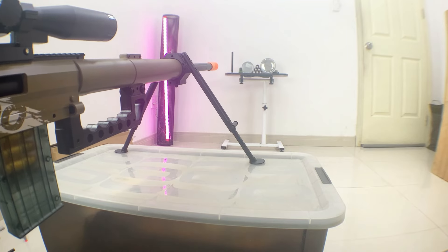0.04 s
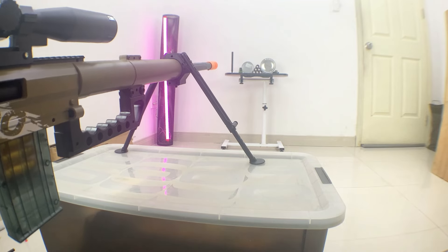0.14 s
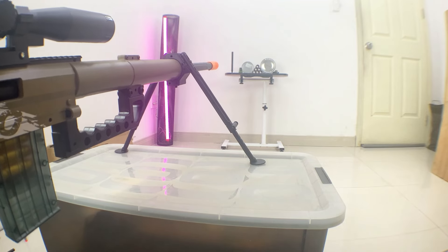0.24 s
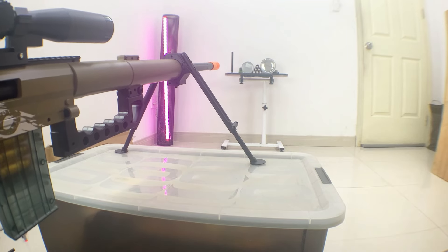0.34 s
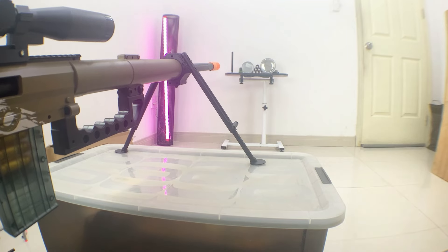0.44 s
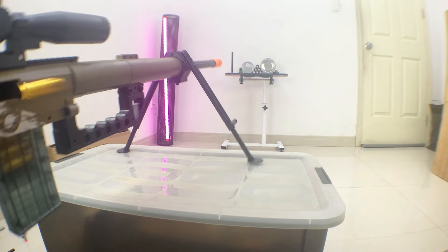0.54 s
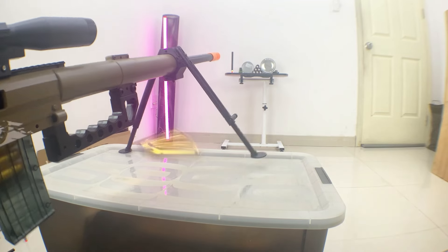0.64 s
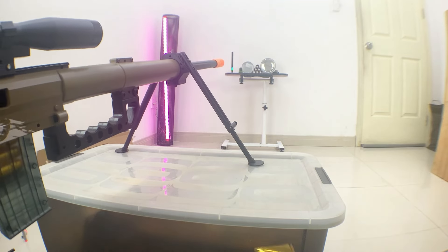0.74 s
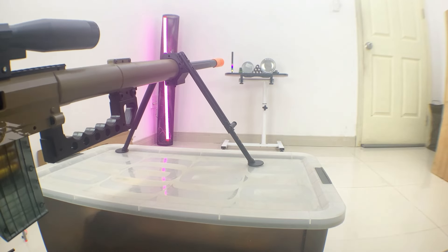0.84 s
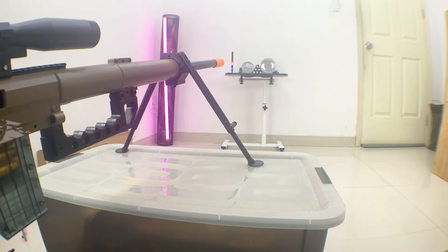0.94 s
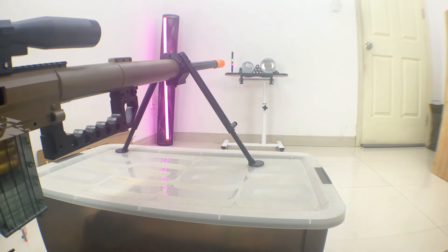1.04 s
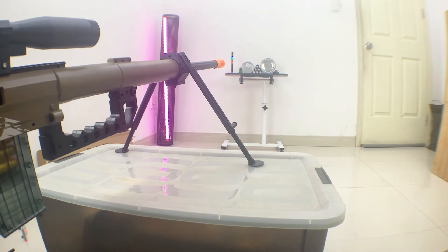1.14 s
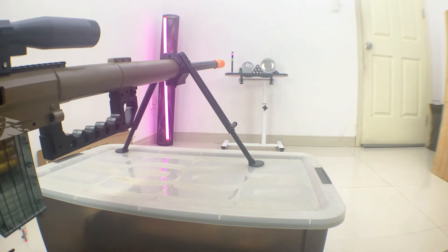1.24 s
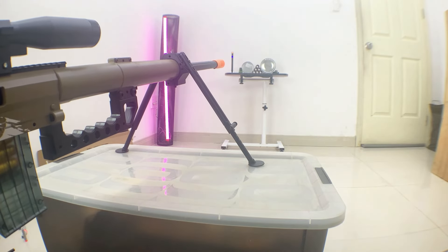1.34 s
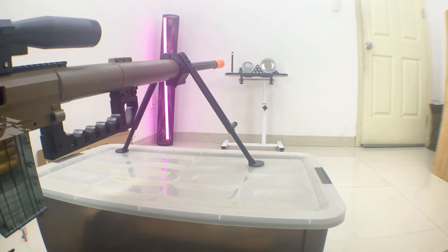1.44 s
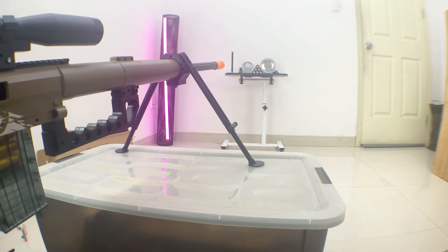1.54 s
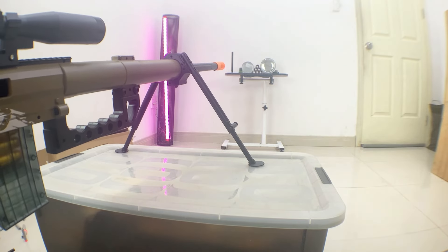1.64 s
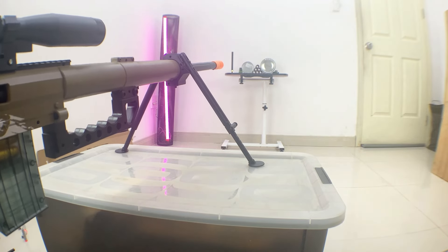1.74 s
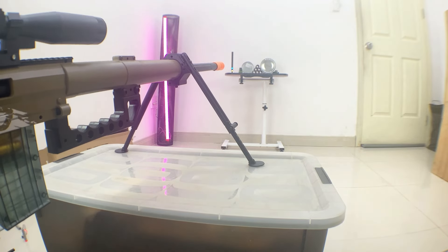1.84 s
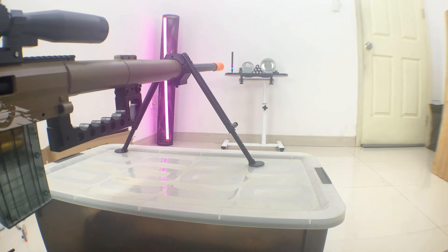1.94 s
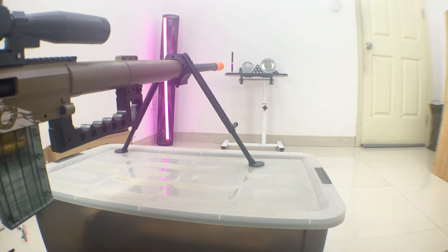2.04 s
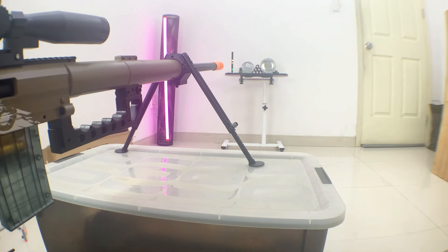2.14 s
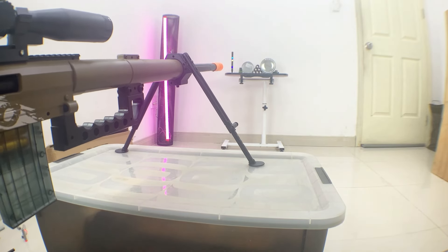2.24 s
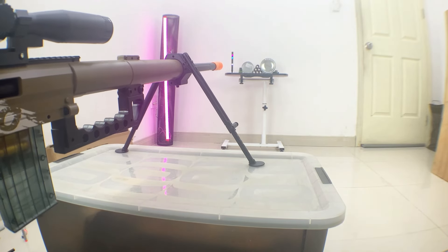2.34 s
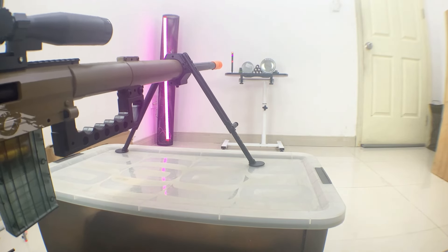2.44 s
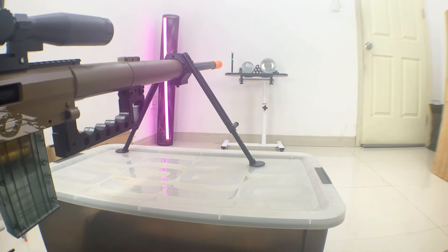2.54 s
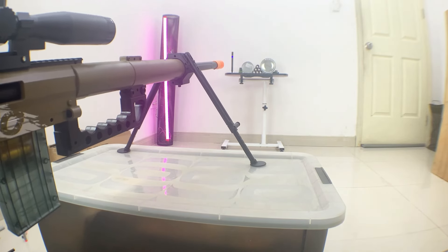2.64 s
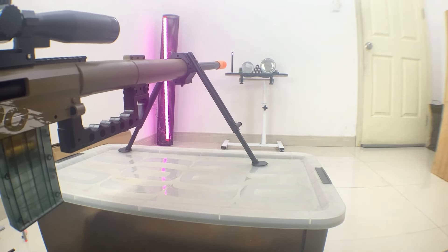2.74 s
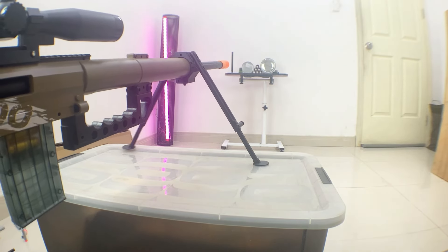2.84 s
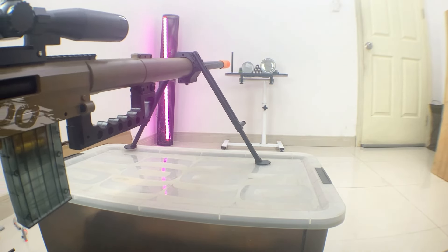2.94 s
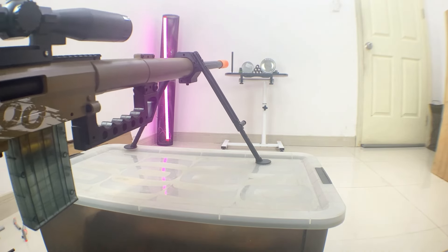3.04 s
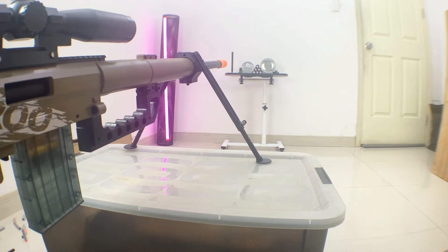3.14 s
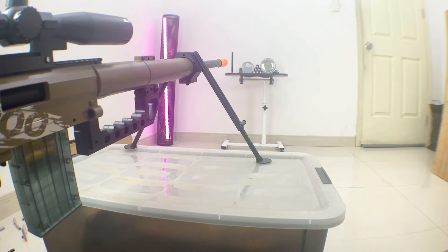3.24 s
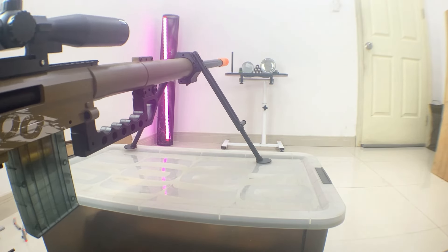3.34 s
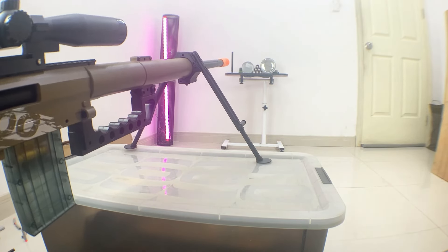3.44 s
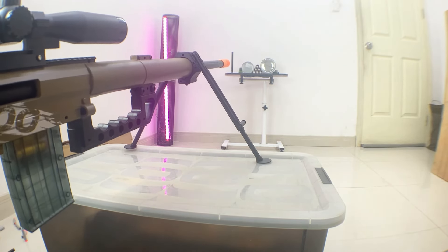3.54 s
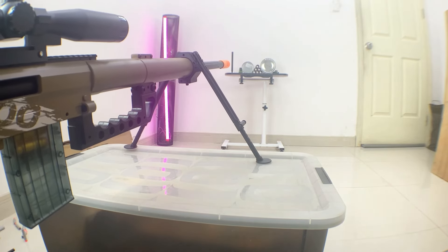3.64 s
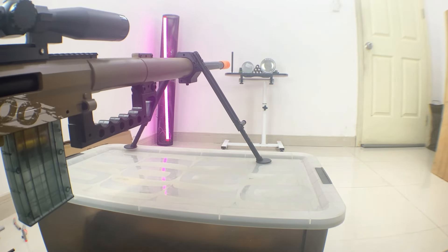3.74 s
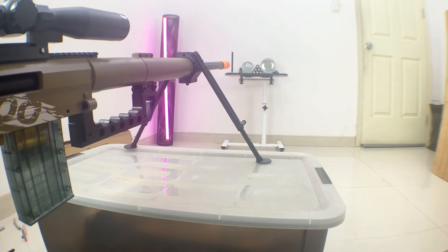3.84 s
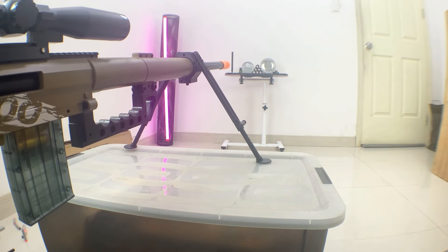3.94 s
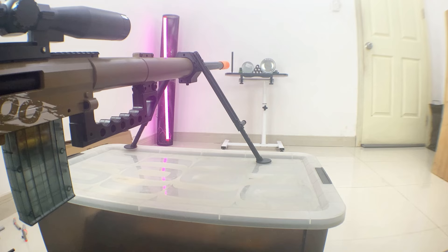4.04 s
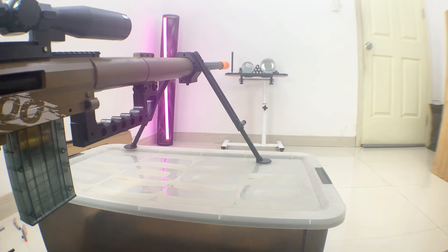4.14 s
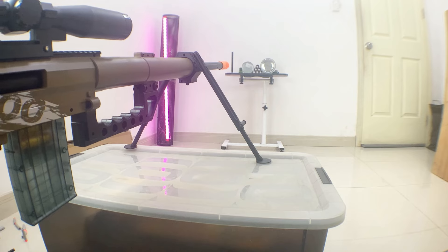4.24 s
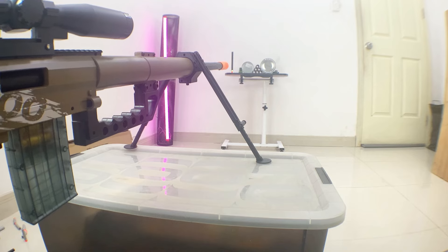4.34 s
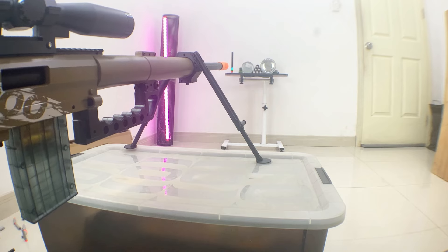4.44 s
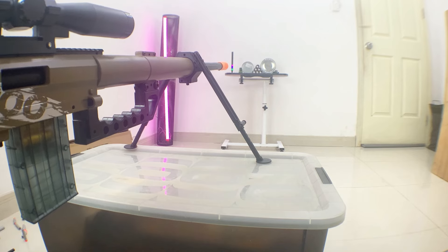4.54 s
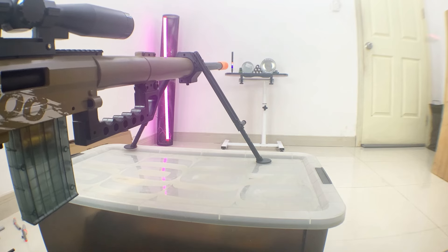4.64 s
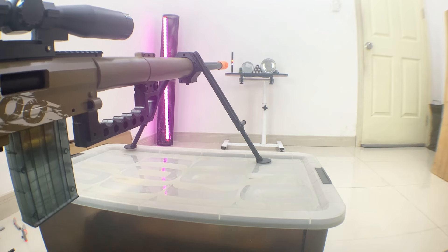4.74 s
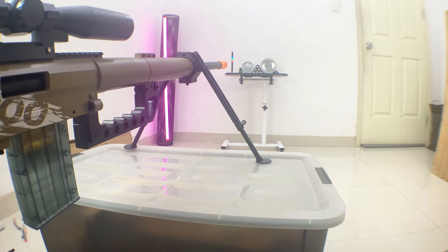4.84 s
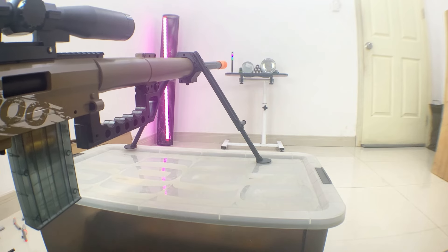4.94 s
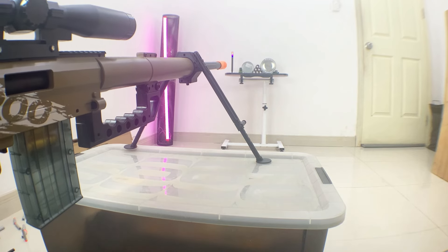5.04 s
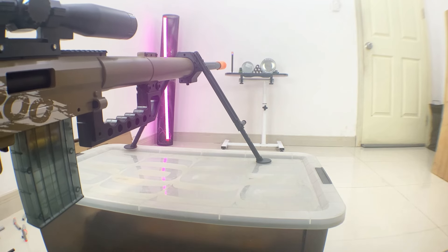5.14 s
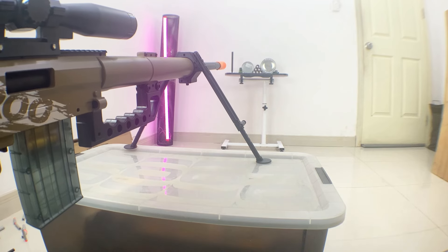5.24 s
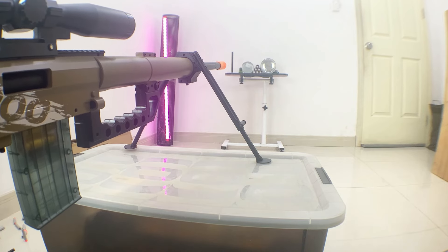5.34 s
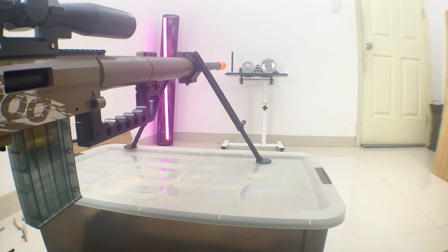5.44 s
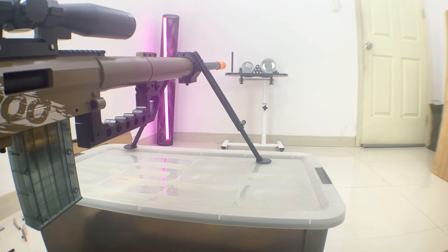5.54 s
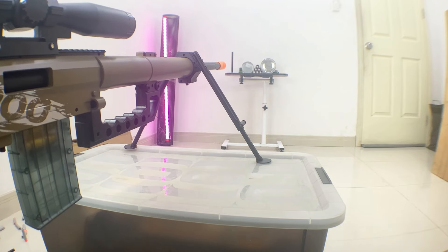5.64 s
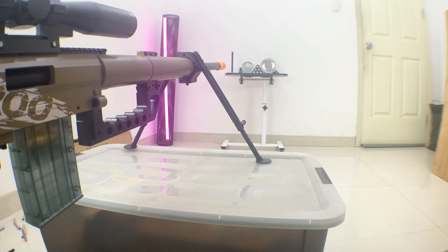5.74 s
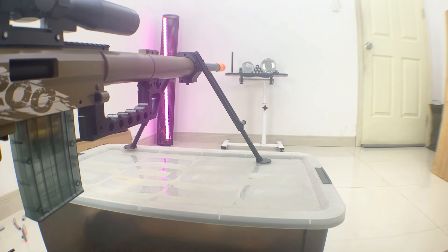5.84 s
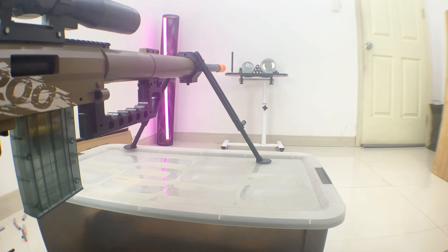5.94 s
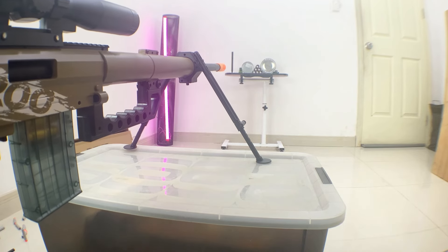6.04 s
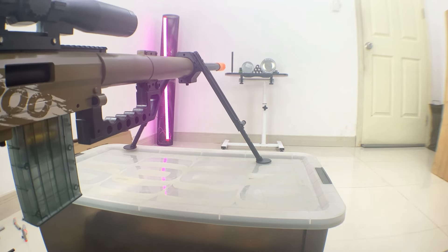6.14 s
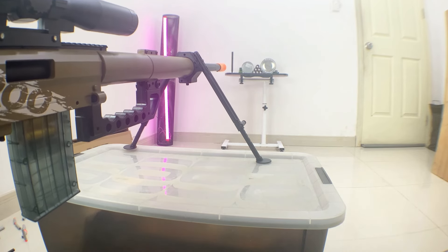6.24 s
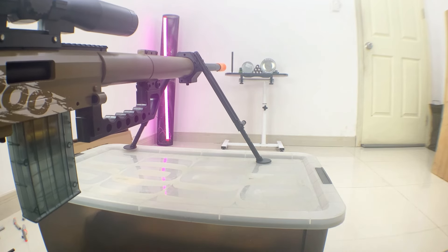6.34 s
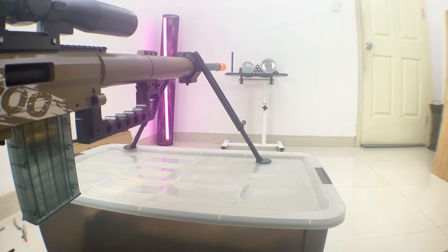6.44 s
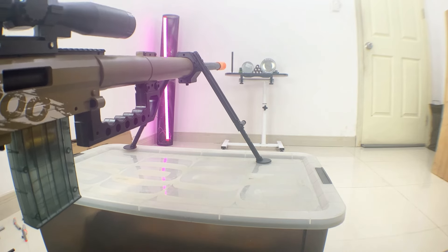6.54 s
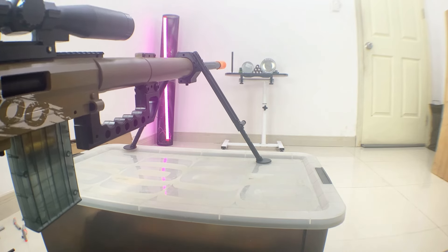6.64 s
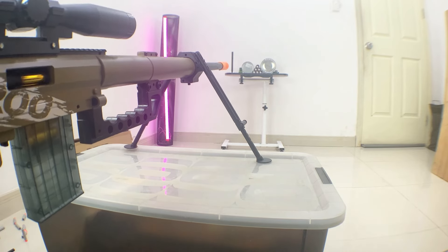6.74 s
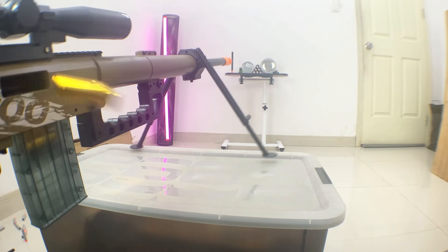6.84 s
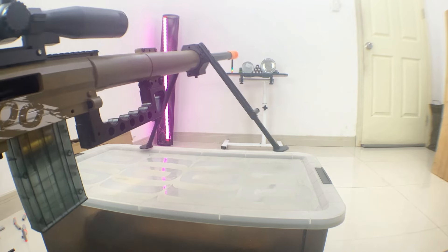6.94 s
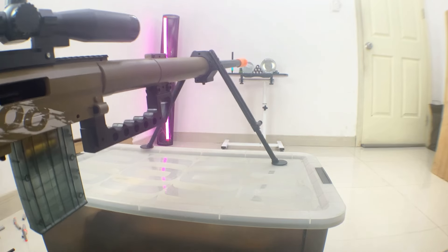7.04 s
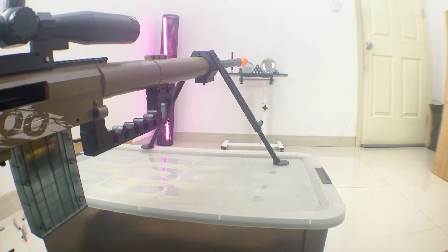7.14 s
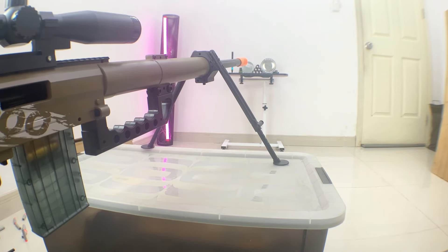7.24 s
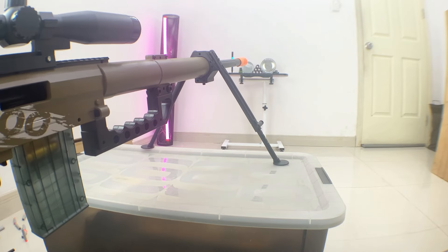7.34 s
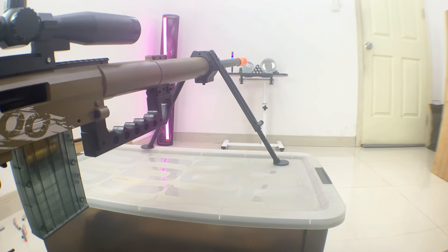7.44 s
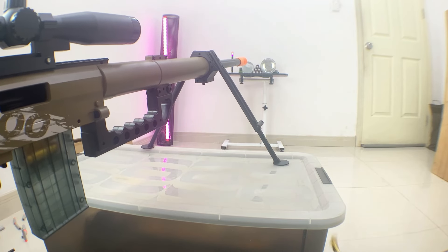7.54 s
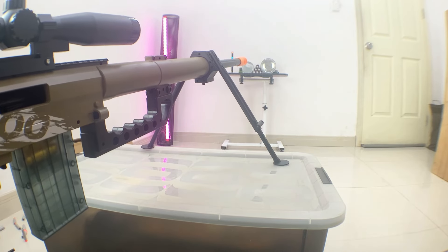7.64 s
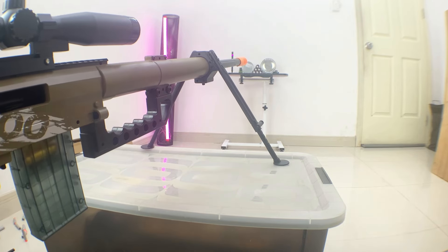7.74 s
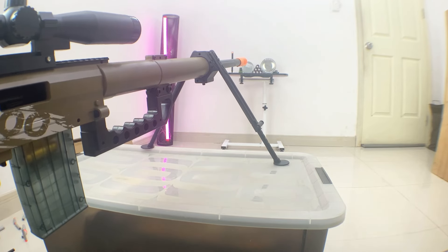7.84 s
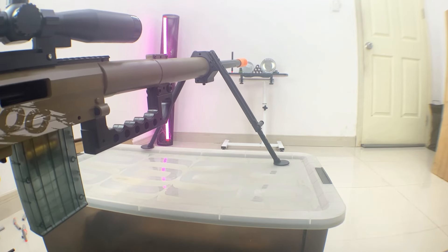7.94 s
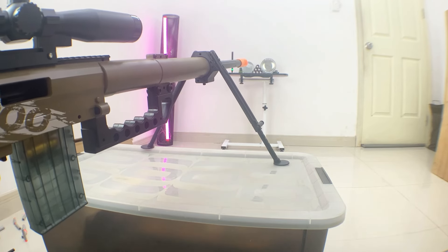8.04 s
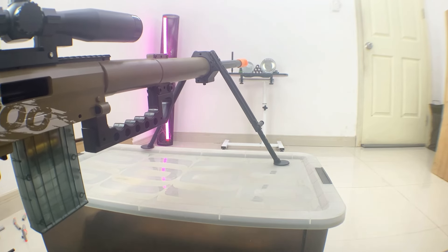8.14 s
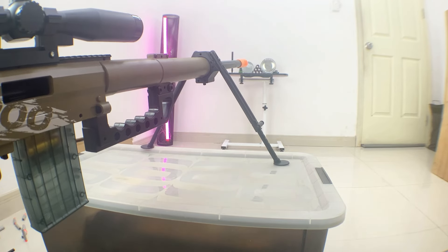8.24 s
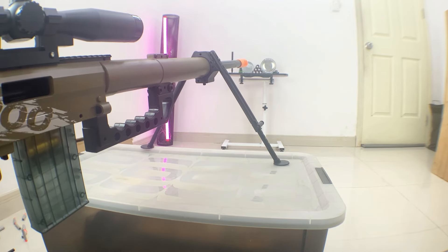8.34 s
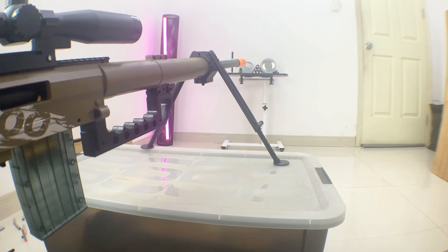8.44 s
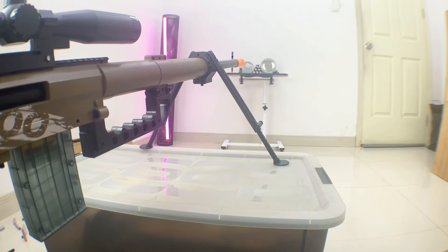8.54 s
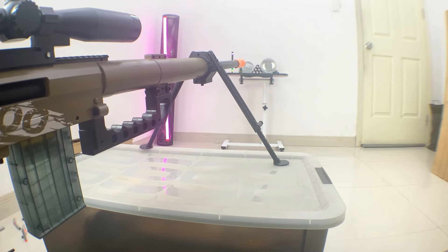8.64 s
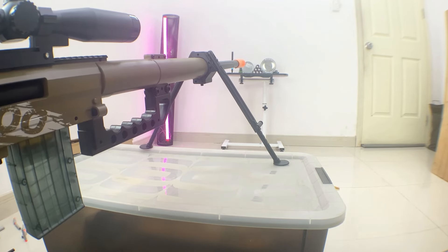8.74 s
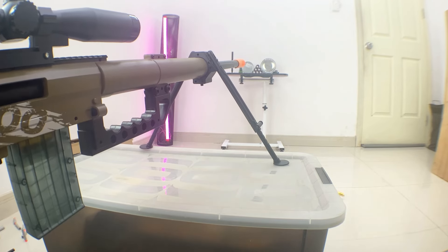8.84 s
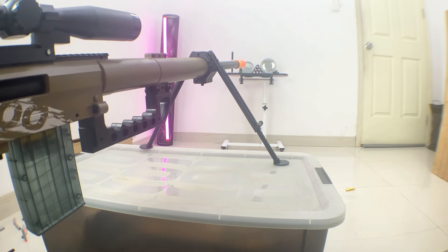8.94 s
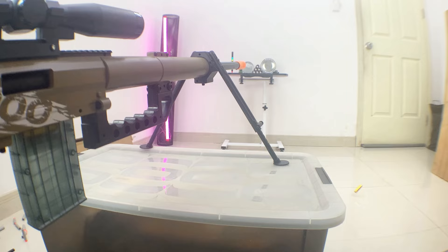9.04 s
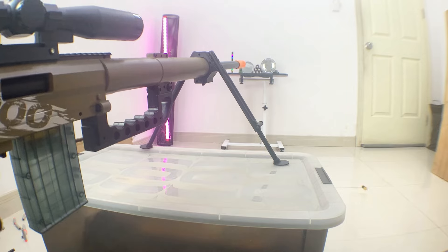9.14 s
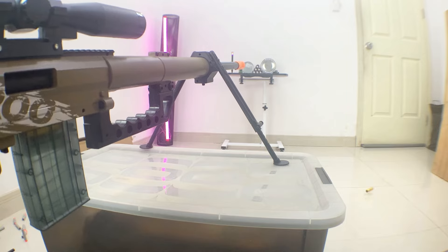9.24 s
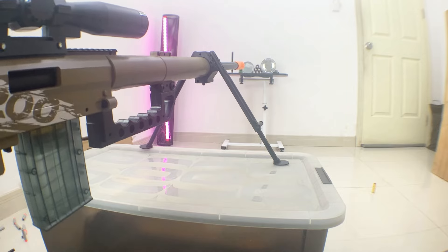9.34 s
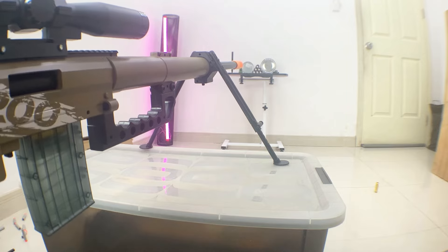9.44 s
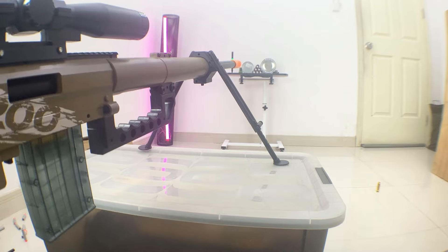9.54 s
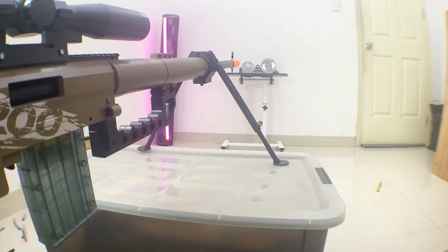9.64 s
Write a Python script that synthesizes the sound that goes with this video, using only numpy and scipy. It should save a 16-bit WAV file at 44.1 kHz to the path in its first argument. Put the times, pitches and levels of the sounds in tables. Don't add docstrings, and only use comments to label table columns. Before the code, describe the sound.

Steady faint hiss, narrow appliance whine and low rumble in a hard tiled room, microphone close to the stock. At 0.45-0.56 s a bolt scrapes and ends in a cluster of sharp plastic clacks; boomy tub thumps and a snap at 0.73-0.85, then shells hit tile at 0.9 and 1.27. A second stroke clacks at 1.6-1.75, snaps at 2.0, while a shell rolls brightly until about 2.9. Quiet with faint creaks. At 4.26 a trigger clack, at 4.36 an enormous clipped slam, juddering for about 0.15 s, spring ringing away until about 5. A far dart knock at 4.98. Tiny rubber squeak at 6.0. Slow scrape from 6.6, clacks 6.77-6.88, hard snap and thumps at 7.0, shell bounces 7.03-7.9. Shell drop at 8.24, quick strokes at 8.4-8.5 and 8.93-9.04, bounces and short rolls between, then a thump at 9.5 and last taps.

```python
import sys
import numpy as np
from scipy import signal
from scipy.fft import rfft, irfft, next_fast_len
from scipy.io import wavfile
from scipy.ndimage import uniform_filter1d

SR = 44100
rng = np.random.default_rng(int(sys.argv[2]) if len(sys.argv) > 2 else 0)


def how_loud(loudness_db):
    steps = np.asarray(loudness_db, float) / 20
    return 10 ** steps


def wav_out(sig):
    wavfile.write(sys.argv[1], SR, np.round(np.clip(np.atleast_2d(sig).T, -1, 1) * 32767).astype(np.int16))


N = 427769


def unit(x):
    return x / np.sqrt(np.mean(x ** 2) + 1e-20)


def along(points, hz):
    f, v = np.transpose(points)
    return np.interp(np.log(hz + 1), np.log(f + 1), v)


def span(start, length):
    t = np.arange(N) / SR - start
    return t, (t >= 0) & (t < length)


def add(track, s, sound):
    start = round(s * SR)
    track[start:start + len(sound)] += sound[:len(track) - start]


def filtered(x, response):
    m = next_fast_len(len(x) + SR // 4)
    return irfft(rfft(x, m) * response(np.fft.rfftfreq(m, 1 / SR)), m)[:len(x)]


def peak(f, hz, width):
    return 1j * f * width / (hz * hz - f * f + 1j * f * width)


def below(f, hz, damping=1.4):
    return 1 / (1 + damping * 1j * f / hz - (f / hz) ** 2)


def above(f, hz):
    return (f / hz) ** 4 * below(f, hz) ** 2


def impulse(size=4096):
    return np.eye(1, size)[0]


def noise(spectrum, patchy_db):
    z = signal.stft(rng.standard_normal(N), nperseg=512)[2]
    field = uniform_filter1d(rng.standard_normal(z.shape), size=5, axis=0)
    field = uniform_filter1d(field, size=10, axis=1)
    x = signal.istft(z * how_loud(patchy_db * unit(field)), nperseg=512)[1][:N]
    return unit(filtered(x, spectrum))


def grains(per_s, spread_db):
    where, size, sign = rng.random((3, N))
    return unit((where < per_s / SR) * how_loud(-spread_db * np.log(size + 0.0039)) * np.sign(sign - .5))


TAIL = 32768
# (freq_hz, t60_s)
ROOM = [(150, 0.29), (400, 0.49), (1500, 0.45), (4000, 0.56), (8000, 0.43), (12000, 0.55), (16000, 0.85)]


def room(x, wet_db, smooth=None):
    hz, t, z = signal.stft(rng.standard_normal(TAIL), SR, nperseg=256)
    decay = how_loud(-60 * t / along(ROOM, hz)[:, None])
    tail = signal.istft(z * decay, SR, nperseg=256)[1][:TAIL]
    tail = tail * (1 - np.exp(-np.arange(TAIL) / SR / 0.0013))
    tail = filtered(tail, lambda f: below(f, 11000) ** 2)
    feed = x
    if smooth is not None:
        feed = smooth * np.linalg.norm(x) / np.linalg.norm(smooth)
    wet = signal.fftconvolve(feed, tail / np.linalg.norm(tail))
    return np.pad(x, (0, TAIL - 1)) + how_loud(wet_db) * wet


def rattle(t60, size=4096):
    chance = rng.standard_normal(size)
    return (chance * np.abs(chance) + 6 * impulse(size)) * how_loud(-60 * np.arange(size) / SR / t60)


# (pitch_hz, t60_s)
SHELL = [(2400, 0.012), (5240, 0.017), (7750, 0.011), (8600, 0.02), (11500, 0.0076)]


def shell_ring(levels_db, modes=SHELL):
    t = np.arange(2048) / SR
    ring = sum(how_loud(db - 60 * t / t60) * np.sin(2 * np.pi * hz * t)
               for db, (hz, t60) in zip(levels_db, modes))
    return (1 - np.exp(-t / 0.00029)) * ring


# (time_s, level_db)
AIR = [(0, -64.5), (.6, -66), (2.2, -67.5), (3.1, -62.5), (4.2, -63), (5.3, -59.5), (6.3, -64), (7.1, -62),
       (7.8, -61), (9.7, -57.5)]
# (freq_hz, density_db)
RUMBLE = [(12, -28), (20, 4), (128, -9.5), (182, -16.5), (231, -34), (300, -17.5), (390, -52.5),
          (660, -120)]
# (freq_hz, density_db)
HISS = [(150, -8.5), (606, -7.5), (1120, -14.5), (1530, -12), (2550, -17), (3290, -11.5), (8290, -27.5),
        (16000, -34.5)]
# (pitch_hz, width_hz, level_db)
WHINE = [(333, 140, 0.5), (590, 76, -1), (1650, 17, -0.5), (1840, 46, -16.5), (3284, 110, -2.5),
         (4100, 100, -8), (5630, 49, -23.5), (7230, 26, -8.5), (8970, 1400, -23), (10800, 64, -12.5),
         (12400, 400, -25.5), (12600, 110, -28.5)]
RUMBLE_DB, RUMBLE_FOLLOWS = -53, 0.4


def background():
    hiss_db = np.interp(np.arange(N) / SR, *np.transpose(AIR))
    rumble_db = RUMBLE_DB + RUMBLE_FOLLOWS * (hiss_db - hiss_db.mean())
    rumble = noise(lambda f: how_loud(along(RUMBLE, f)), patchy_db=2.5)

    def whine(f):
        return sum(how_loud(db) * abs(peak(f, hz, w)) ** 2 for hz, w, db in WHINE)

    hiss = noise(lambda f: how_loud(along(HISS, f)), patchy_db=0.0)
    hiss = hiss + how_loud(-2.5) * noise(whine, patchy_db=2.5)
    return how_loud(rumble_db) * rumble + how_loud(hiss_db + 3.0) * hiss


# (start_s, list of level_db for each table mode)
DART = (4.9757, [-19, -17, -9, -16, -17.5])
# (pitch_hz, t60_s)
TABLE = [(1700, 0.025), (2300, 0.0088), (2750, 0.0082), (3050, 0.0057), (4750, 0.008)]


def dart():
    out = np.zeros(N)
    start_s, levels_db = DART
    judder = rattle(0.09)
    knock = signal.fftconvolve(judder / np.linalg.norm(judder), shell_ring(levels_db, TABLE))
    add(out, start_s, room(how_loud(-0.5) * knock, wet_db=-9.5))
    return out


# (start_s, length_s, pitch_hz, glide_hz_per_s, level_db)
SQUEAKS = [
    (6, 0.021, 3080, -4000, -45.5),
    (6.019, 0.019, 2970, 9000, -35.5),
    (6.032, 0.081, 3570, -1500, -44),
    (6.044, 0.065, 3150, -4000, -45),
]
SLIP_ARCH_DB = 9


def squeaks():
    out = np.zeros(N)
    for s, length, hz, glide, db in SQUEAKS:
        t, inside = span(s, length)
        flutter = unit(uniform_filter1d(rng.standard_normal(N), size=90))
        phase = 2 * np.pi * np.cumsum(inside * (hz + glide * t) * (1 + .012 * flutter)) / SR
        arch_db = -SLIP_ARCH_DB * np.clip(2 * t / length - 1, -1, 1) ** 2
        tone = np.sin(phase) + 0.14 * np.sin(2 * phase) + 0.065 * np.sin(3 * phase)
        out += inside * how_loud(db + arch_db + 4.5 * flutter) * tone
    return room(out, wet_db=-11.5)[:N]


# (start_s, peak_db, pitch_hz, t60_s)
THUMPS = [(0.731, -17, 94.2, 0.031), (0.741, -5.5, 156, 0.024), (0.75, -12.5, 219, 0.034),
          (0.755, -13.5, 129.7, 0.066), (0.764, -2, 113, 0.017), (0.843, -20, 145.6, 0.068),
          (1.658, -23, 176, 0.039), (2.038, -46, 131, 0.072), (2.93, -30.5, 379, 0.03),
          (4.265, -13.5, 548.5, 0.065), (4.259, -16.5, 349.7, 0.12), (4.262, -23.5, 200.2, 0.08),
          (7.011, -23, 405, 0.022), (7.072, -19, 209.5, 0.056), (7.101, -21.5, 145.2, 0.05),
          (8.485, -31, 338, 0.028), (9.032, -40.5, 134, 0.17), (9.514, -5, 455, 0.015),
          (1.791, -34.5, 109, 0.095),
    (2.071, -36, 96.6, 0.2),
    (4.255, -27, 89.4, 0.085),
    (9.527, -22.5, 128, 0.06),
    (9.581, -35.5, 110.4, 0.09),
]


def thumps():
    out = np.zeros(N)
    t = np.arange(8192) / SR
    for s, db, hz, t60 in THUMPS:
        tone = sum(level * np.sin(2 * np.pi * ratio * hz * t)
                   for ratio, level in [(1, 0.86), (1.9, .5), (3.1, .3)])
        boom = how_loud(db - 60 * t / t60) * tone * (1 - np.exp(-t / 0.0056))
        add(out, s, room(boom, wet_db=-5.5))
    return out


# (start_s, length_s,
# final_db, swell_db)
SLIDES = [
    (0.127, 0.24, -79, -18),
    (0.451, 0.12, -30, 31.5),
    (1.619, 0.16, -31, 31),
    (6.62, 0.28, -39.5, 25),
    (8.404, 0.11, -35.5, 26),
    (8.933, 0.11, -37.5, 31),
]
# (freq_hz, density_db)
RAIL = [(150, -55), (330, -17), (636, 1.5), (775, -3.5), (946, -1), (3230, -6), (10100, -19.5),
        (15000, -47)]
SWELL_BEND = 1.32


def slides():
    scrape = unit(filtered(grains(per_s=700, spread_db=4), lambda f: how_loud(along(RAIL, f))))
    stroke = np.zeros(N)
    for s, length, db, swell_db in SLIDES:
        t, inside = span(s, length)
        stroke += inside * how_loud(db - swell_db * np.clip(1 - t / length, 0, 1) ** SWELL_BEND)
    return how_loud(-0.5) * room(stroke * scrape, wet_db=1.0)[:N]


# (start_s, length_s, top_mode_db, low_modes_db, grit_db)
ROLLS = [
    (1.884, 0.95, -43.5, -82, -44),
    (8.69, 0.16, -62, -41.5, -55),
    (9.258, 0.038, -40, -53, -33.5),
    (9.408, 0.4, -54, -38.5, -54),
]
# (freq_hz, density_db)
GRIT = [(180, -39), (300, -12.5), (1570, -14.5), (8360, -4.5), (9190, -13.5), (9630, -62), (11500, -35),
        (13000, -49)]
# (pitch_hz, t60_s)
WORN_SHELL = [(2280, 0.017), (5200, 0.022)]
# (pitch_hz, t60_s)
FRESH_SHELL = [(2500, 0.012), (5250, 0.014)]
WORN_FROM_S = 9
ROLL_IN_S, ROLL_OUT_S, ROLL_EDGE_DB, ROLL_SAG_DB_PER_S = 0.04, 0.13, 32, 6


def rolls():
    out = np.zeros(N)
    taps = grains(per_s=880, spread_db=4.5)

    def rung(ring):
        return unit(signal.fftconvolve(taps, ring)[:N])

    top = rung(shell_ring([-41, -13.5, -28, 4.0, -11.5]))
    fresh = rung(shell_ring([0, -14], FRESH_SHELL))
    worn = rung(shell_ring([0, -6], WORN_SHELL))
    grit = unit(filtered(grains(per_s=3000, spread_db=4), lambda f: how_loud(along(GRIT, f))))
    for s, length, top_db, low_db, grit_db in ROLLS:
        t = np.arange(N) / SR - s
        away = np.maximum(np.maximum(-t / ROLL_IN_S, (t - length) / ROLL_OUT_S), 0)
        speed = how_loud(-ROLL_EDGE_DB * away - ROLL_SAG_DB_PER_S * np.abs(t))
        low = worn if s > WORN_FROM_S else fresh
        out += speed * (how_loud(top_db) * top + how_loud(low_db) * low + how_loud(grit_db) * grit)
    return how_loud(-9.5) * room(out, wet_db=1.5)[:N]


# (start_s, peak_db)
ON_END = [(1.884, -24), (2.091, -26), (2.209, -34), (2.2657, -35), (2.3228, -40), (2.472, -28),
          (2.574, -33), (2.6202, -31.5), (7.9094, -2.5), (9.2623, -22.5)]
ON_EDGE = [
    (1.2738, -2),
    (2.164, -26),
    (2.4049, -33),
    (2.5092, -21.5),
]
FLAT = [
    (0.8946, -7.5),
    (1.9645, -17),
    (7.0338, -12.5),
    (7.2463, -6),
    (7.5118, -8),
]
ON_RIM = [
    (8.2392, -16.5),
    (8.5375, -12.5),
    (8.8614, -8.5),
    (9.5, -21),
]
ON_SIDE = [(8.678, -27.5), (8.705, -32.5), (8.79, -34), (8.89, -32.5), (8.9194, -36.5), (9.1229, -28),
           (9.2425, -36), (9.3945, -36), (9.4524, -32.5), (9.6225, -34)]
# (level_db of the four lowest modes, thud_db)
LANDINGS = [
    (-59, -24.5, -14.5, -1.5, 16),
    (-43, -27.5, -18.5, -11.5, 21),
    (-17.5, -20, -14, -21, 25),
    (-19.5, -10, -22, -32, 13),
    (-0.5, -32, -20, -29, 18),
]
# (top_hz, share cancelled between the two lowest modes)
CONTACTS = [
    (9500, 0.092),
    (9500, 0.2),
    (14500, 1),
    (8960, 0.3),
    (8000, 0.1),
]
# (pitch_hz, width_hz)
WALL = [(1300, 2600), (5400, 1300), (6900, 3900), (7400, 2400)]
FACING = [1, 1, -1, 1]


def bounces():
    out = np.zeros(N)
    tick = filtered(impulse(2048), lambda f: peak(f, 5000, 4300) * below(f, 10000, 1.3))
    kinds = zip([ON_END, ON_EDGE, FLAT, ON_RIM, ON_SIDE], LANDINGS, CONTACTS)
    for rows, (*modes_db, thud_db), (top_hz, hollow) in kinds:
        def wall(f):
            moving = sum(way * how_loud(level) * peak(f, *band)
                         for way, level, band in zip(FACING, modes_db, WALL))
            return moving * (1 - hollow * peak(f, 3760, 1900)) * below(f, top_hz, 1.2)

        thud = filtered(impulse(2048), wall)
        tap = how_loud(-1) * shell_ring([*modes_db, -30]) + how_loud(thud_db) * thud + how_loud(-7) * tick
        for s, db in rows:
            add(out, s, room(how_loud(db) * tap, wet_db=-1.0))
    return out


# (start_s, peak_db, body_hz, air_db, room_db)
STOPS = [(0.5144, -22, 2450, -18, 3.5), (0.526, -9, 2940, -23.5, -12.5), (0.543, -11, 3750, -13, -4.5),
         (0.5571, -5.5, 3520, -16.5, -9), (0.56, -6, 1800, -15.5, -9), (1.267, -19.5, 4500, -11.5, 4),
         (1.6121, -31.5, 3220, -16, -14), (1.6652, -18.5, 760, -38, -0.2), (1.7385, -5.5, 1000, -23, -11),
         (1.7547, -9.5, 2490, -21.5, -7), (4.2649, 4.5, 2707, -13, -3.5), (6.774, -19, 2250, -19, -0.5),
         (6.8106, -17.5, 4300, -21, 0), (6.8295, -8, 3230, -20.5, -9.5), (6.8793, -6, 3400, -17.5, -8),
         (8.4885, -9.5, 1960, -19, -4.5), (8.4935, -10.5, 2930, -21, -6)]
# (start_s, peak_db, body_hz, air_db, room_db)
SNAPS = [
    (0.831, -9.5, 1400, -24, -7.5),
    (0.9034, -13.5, 3360, -24, -7),
    (2.0082, -9.5, 4380, -31, -6),
    (7.0145, -5.5, 4440, -12, -14),
    (7.0314, -11, 2000, -11.5, -8),
    (8.518, -12.5, 2495, -25, -6),
    (9.0374, -6, 4350, -41, -7.5),
]
# (start_s, peak_db, body_hz)
NUDGES = [(0.4578, -47.5, 3220), (0.4854, -30, 3270), (0.5003, -31.5, 1820), (0.5364, -23.5, 3430),
          (1.643, -35, 1330), (1.7199, -16.5, 3120), (2.8745, -40, 1700), (4.2575, -10, 2800),
          (6.6231, -37, 1460), (6.6865, -34.5, 2450), (6.7382, -29, 2030), (8.3884, -31.5, 3520),
          (8.3967, -30, 2060), (8.4223, -25, 1930), (8.4711, -19, 1100), (9.4973, -34.5, 2260),
          (9.516, -27.5, 2100)]
# (start_s, peak_db, body_hz)
PATS = [
    (0.7317, -21.5, 910),
    (1.1638, -42.5, 1670),
    (6.1669, -39, 1290),
    (7.0742, -25.5, 900),
]
# (start_s, peak_db, body_hz)
TICKS = [(2.2885, -38, 2560), (2.4723, -27, 4500), (2.574, -29, 4500), (4.9756, -24, 2500),
         (8.2538, -18.5, 4580), (8.9006, -24.5, 2570), (8.9452, -29, 2600), (7.9, -46, 3500),
         (0.16, -43, 4500), (8.68, -27, 4500), (9.0, -36, 4600), (6.7865, -24.5, 1400), (5.6, -34, 3000)]
# (start_s, peak_db, body_hz)
CREAKS = [(0.193, -39, 1480), (0.2219, -37.5, 1580), (0.2444, -42, 1230), (3.2261, -43.5, 1990),
          (3.5967, -44.5, 1540), (3.7837, -44.5, 3234), (5.2588, -41.5, 2390), (5.5686, -41.5, 2120),
          (5.9125, -40.5, 1580), (9.0212, -37.5, 1770)]
# (bass_db, air_db, room_db)
NUDGE, PAT, TICK, CREAK = (-13, -24, 1.6), (9.7, -26, -1.8), (-27.5, -17.5, 0.56), (-18, -43.5, -8)
STOP_BASS_DB = -23.5
STOP_RATTLE_S, SNAP_RATTLE_S, SOFT_RATTLE_S = 0.028, 0.015, 0.03
FRAME_LOW_HZ, FRAME_HIGH_HZ = 450, 6000


def clacks():
    out = np.zeros(N)
    soft = [(NUDGES, NUDGE), (PATS, PAT), (TICKS, TICK), (CREAKS, CREAK)]
    hard = [(STOPS, STOP_RATTLE_S), (SNAPS, SNAP_RATTLE_S)]
    contacts = sorted((*row[:3], STOP_BASS_DB, *row[3:], t60) for rows, t60 in hard for row in rows)
    contacts += [(*row, *kind, SOFT_RATTLE_S) for rows, kind in soft for row in rows]
    for s, db, hz, bass_db, air_db, wet_db, t60 in contacts:
        def body(f):
            panel = above(f, FRAME_LOW_HZ) * peak(f, 2800, 2800) * below(f, FRAME_HIGH_HZ)
            bass = how_loud(bass_db + 18.5) * above(f, 200 - 5 * bass_db) * peak(f, 670, 850)
            air = how_loud(air_db + 6.0) * peak(f, 9700, 12000)
            resonance = 1 + 1.8 * peak(f, hz, 0.11 * hz)
            return (panel - bass - air) * resonance * below(f, 8500) * below(f, 13000, 1.2) ** 2

        hit = filtered(rattle(t60), body)
        sound = room(hit, wet_db, smooth=filtered(impulse(), body))
        add(out, s, how_loud(db) / np.abs(hit).max() * sound)
    return out


# (start_s, level_db)
SHOT = (4.3622, 7.9)
# (pitch_hz, width_hz, level_db)
BARREL = [(331.4, 11.9, 5.5), (299, 25, -2), (393.7, 32, 3.5), (414.6, 45, 5), (584, 35, -5.5),
          (760, 74, -4.5), (1325, 30, -3), (1563, 72, -5), (1680, 40, 0), (2130, 110, -10.5),
          (2750, 100, -12), (4126, 380, -9), (4630, 310, -9.5), (6800, 950, -16.5)]
# (freq_hz, density_db)
SLAM = [(150, -61), (260, -29.5), (330, -11), (2000, -7.5), (4500, -10), (8000, -15.5), (13500, -40),
        (16000, -71.5)]
# (start_s, level_db)
JOLTS = [
    (4.384, 3.5),
    (4.413, 4.5),
    (4.436, 8),
    (4.461, 8.5),
    (4.48, 10),
    (4.508, 11.5),
]
# (pitch_hz, level_db, t60_s, sway_db)
SPRING = [(328, -15.5, 0.39, 2), (397, -19, .45, 2.5), (424, -15, .55, 2.5), (1335, -25.5, 0.85, 3.5),
          (1680, -21, 0.88, 4), (4120, -25.5, .7, 4), (2770, -26.5, .6, 3.5), (590, -23, 0.49, 3),
          (770, -22, .45, 3)]
# (pitch_hz, level_db, t60_s, sway_db)
LEG = [(855, -29, 1.35, 1.5)]
# (start_s, level_db, pitch_hz, t60_s)
TWANGS = [
    (4.364, -10, 421, 0.4),
    (4.366, -12.5, 328, 0.45),
    (4.42, -10.5, 1670, 0.3),
    (4.549, -11.5, 1347, 0.11),
    (4.66, -22, 1683, 0.11),
    (4.755, -24, 1335, 0.12),
]
SLAM_ATTACK_S, SLAM_T60_S = 0.0024, 0.43
BUZZ_DB, BUZZ_T60_S = -27, 1.59
SETTLE_S, SETTLE_T60_S = 0.152, 0.13
WIND_UP_S, LET_GO_S = 0.011, 0.0037


def shot():
    out = np.zeros(N)
    t = np.arange(SR) / SR
    shot_s, shot_db = SHOT

    def barrel(f):
        modes = sum((-1) ** k * how_loud(level) * peak(f, hz, w) for k, (hz, w, level) in enumerate(BARREL))
        return above(f, 230) * modes / (1 + (f / 9000) ** 4)

    buzz = grains(per_s=3200, spread_db=1.5)
    broad = unit(filtered(buzz[::-1], lambda f: how_loud(along(SLAM, f))))
    slam = unit(filtered(buzz, barrel)) + how_loud(-5) * broad

    since, inside = span(shot_s - SLAM_ATTACK_S, 0.66)
    attack = np.clip(since / SLAM_ATTACK_S, 0, 1) ** 3
    fall = since / SLAM_T60_S + np.maximum(since - SETTLE_S, 0) / SETTLE_T60_S
    slam_force = how_loud(-60 * inside * fall)
    buzz_force = how_loud(BUZZ_DB - 60 * inside * since / BUZZ_T60_S)
    force = attack * (slam_force + buzz_force)

    jolt_s, jolt_peak_db = np.transpose(JOLTS)
    lead = np.arange(N) / SR - jolt_s[:, None]
    jolt_db = jolt_peak_db @ np.exp(-np.maximum(-lead / WIND_UP_S, lead / LET_GO_S))
    blast = how_loud(shot_db - 6 + jolt_db) * inside * force * unit(slam)
    out += room(blast, wet_db=-10.5)[:N]

    for hz, level_db, decay, sway_db in SPRING + LEG:
        sway = unit(uniform_filter1d(rng.standard_normal(SR), size=900))
        tone = np.sin(2 * np.pi * hz * t + 0.3 * sway_db * sway[::-1])
        ring = how_loud(level_db + sway_db * sway - 60 * t / decay) * tone
        add(out, shot_s, room(ring, wet_db=-7.5))
    for s, level_db, hz, decay in TWANGS:
        swell = 1 - np.exp(-t / 0.008)
        add(out, s, how_loud(level_db - 60 * t / decay) * swell * np.sin(2 * np.pi * hz * t))
    return out


def scene():
    around = background() + dart()
    tub_and_floor = squeaks() + thumps() + rolls() + bounces()
    rifle = slides() + clacks() + shot()
    return (around + tub_and_floor + rifle)[None]


def soft_clip(x, top):
    return x / (1 + np.abs(x / top) ** 6) ** (1 / 6)


def masked(x, margin_db, slope_db):
    z = signal.stft(x, SR, nperseg=2048)[2]
    bands = z[:1024].reshape(32, 32, -1)
    number = np.arange(32)[:, None]
    level = 10 * np.log10(np.mean(np.abs(bands) ** 2, axis=1) + 1e-20)
    ramp = slope_db * number
    eligible = level + ramp - 99 * (number < 10)
    cover = np.maximum.accumulate(eligible, axis=0) - ramp - margin_db
    hidden = (level < cover) & (number >= 13) & (number < 22)
    bands = bands * ~hidden[:, None]
    return signal.istft(np.vstack([bands.reshape(1024, -1), z[1024:]]), SR, nperseg=2048)[1][:N]


def roll_off(x):
    return signal.sosfilt(signal.butter(12, 17000, fs=SR, output="sos"), x)


def record(dry):
    ragged = filtered(soft_clip(dry[0], .6), lambda f: 1 - 2 * peak(f, 500, 250))
    band = filtered(soft_clip(ragged, .85), lambda f: f < 15800)
    mix = masked(band, margin_db=12.5, slope_db=3.0)[None]
    return roll_off(mix)


dry = scene()
out = record(dry)
wav_out(out)
```